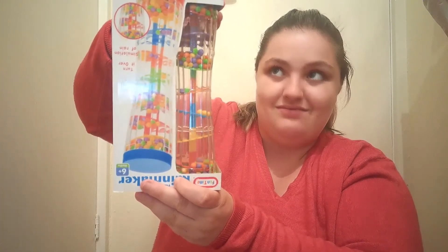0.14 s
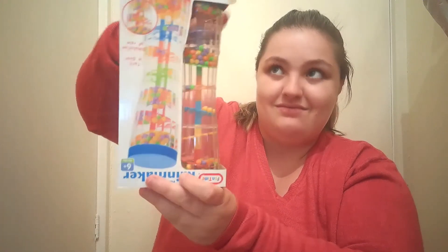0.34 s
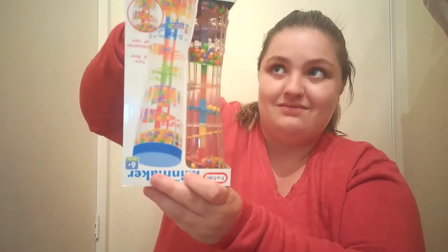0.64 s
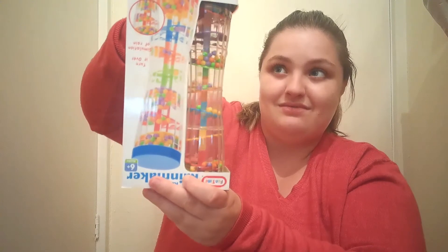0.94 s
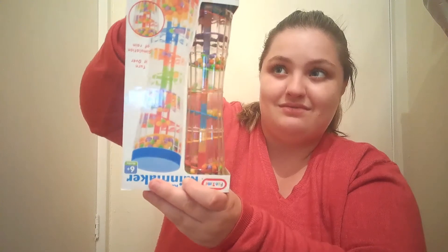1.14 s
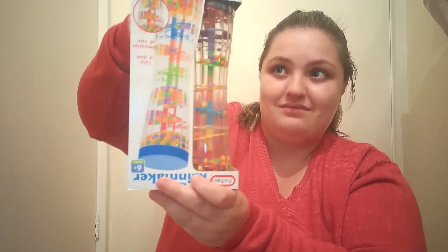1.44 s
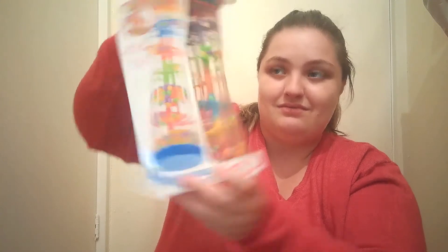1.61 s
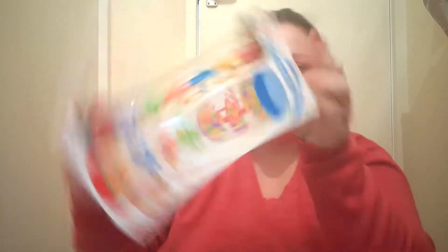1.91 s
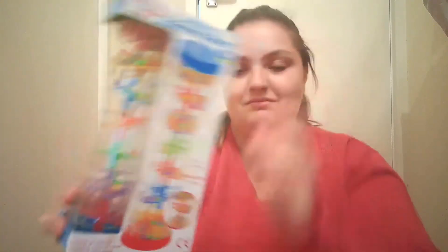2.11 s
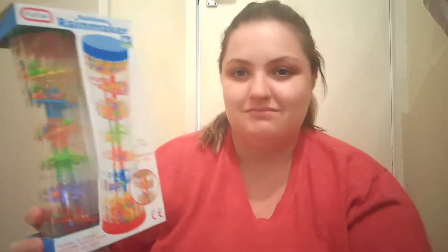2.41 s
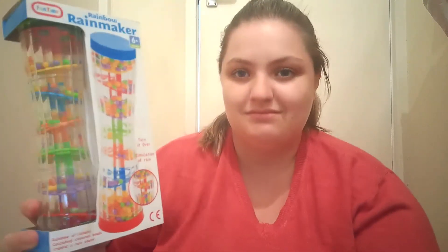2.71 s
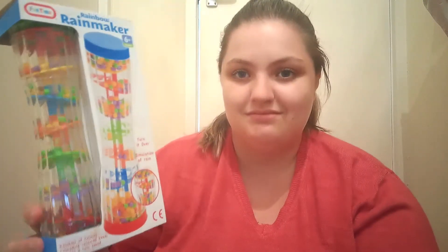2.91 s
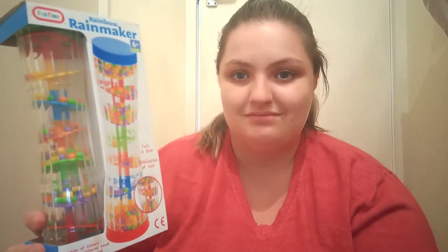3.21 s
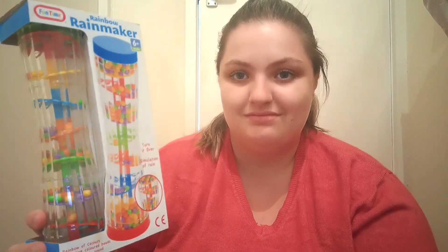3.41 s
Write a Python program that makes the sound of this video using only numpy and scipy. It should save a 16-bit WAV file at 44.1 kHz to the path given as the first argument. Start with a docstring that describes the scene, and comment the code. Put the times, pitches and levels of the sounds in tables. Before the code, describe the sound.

Small plastic beads trickling through a rainmaker toy, a rain-like rattle that grows louder

```python
"""A plastic rainmaker toy in a small, faintly humming room. It opens on a short shake, the packed beads
shimmering as they slam into the end cap. After a pause they trickle down through the baffles: every bead
ticks, the baffles ring near 5 kHz, and the tube's wall and air add hollow resonances. Just after two
seconds the toy is turned over and the beads pour again, harder. Along the way, hands bump the toy."""
import sys
import numpy as np
from scipy import signal
from scipy.fft import rfft, irfft
from scipy.io import wavfile
from scipy.ndimage import uniform_filter1d

SR = 44100
rng = np.random.default_rng(int(sys.argv[2]) if len(sys.argv) > 2 else 0)


def bounce(signal):
    """Save signal as a 16-bit WAV file at the path given by the first command-line argument."""
    frames = np.transpose(np.atleast_2d(signal))
    limited = np.clip(frames, -1, 1)
    pcm = np.round(limited * 32767).astype(np.int16)
    wavfile.write(sys.argv[1], SR, pcm)


N = 156555
T = np.arange(N) / SR


def from_db(db):
    """Decibels to gain."""
    return 10 ** (np.asarray(db) / 20)


def rms_one(x):
    """Scale to rms 1."""
    return x / np.sqrt(np.mean(x ** 2) + 1e-20)


def envelope(rows):
    """Straight ramps between rows of time in seconds and value."""
    return np.interp(T, *np.transpose(rows))


def equalise(x, curve):
    """Minimum-phase EQ of unit power, drawn through rows of frequency in Hz and level in dB."""
    size = 4096
    hz, db = np.transpose(curve)
    grid_hz = np.maximum(np.arange(size // 2 + 1) * SR / size, 1)
    gain = from_db(np.interp(np.log(grid_hz), np.log(hz), db))
    cepstrum = irfft(np.log(gain))
    cepstrum[1:size // 2] *= 2
    cepstrum[size // 2 + 1:] = 0
    response = irfft(np.exp(rfft(cepstrum)))
    return signal.fftconvolve(x, response / np.linalg.norm(response))[:N]


def resonate(x, hz, width_hz):
    """One resonance, gain 1 at its peak."""
    r = np.exp(-np.pi * width_hz / SR)
    feedback = [1, -2 * r * np.cos(2 * np.pi * hz / SR), r * r]
    return signal.lfilter(np.array([1, 0, -1]) * (1 - r * r) / 2, feedback, x + 1e-18)


def band(x, hz, width_hz):
    """A resonance applied twice: rounded onset, steep skirts."""
    return resonate(resonate(x, hz, width_hz), hz, width_hz)


def strikes(rows):
    """One click for each row of start in seconds and level in dB."""
    out = np.zeros(N)
    for start_s, db in rows:
        out[int(start_s * SR)] += from_db(db)
    return out


def bursts(clicks, decay_s):
    """Each click becomes a tiny burst of noise that starts at the click's height."""
    power = signal.lfilter([1], [1, -np.exp(-2 / (decay_s * SR))], clicks ** 2 + 1e-18)
    return np.sqrt(power) * rng.standard_normal(N)


def ring_modes(clicks, modes, blend, spread_db=1.5):
    """Clicks strike each mode unevenly; blend fades the modes from their first level to their second."""
    out, power = 0, 0
    for hz, width_hz, first_db, second_db in modes:
        gain = from_db(first_db + blend * (second_db - first_db))
        strength = rng.choice([-1, 1], N) * from_db(spread_db * rng.uniform(-1, 1, N))
        out = out + gain * band(clicks * strength, hz, width_hz)
        power = power + gain ** 2 * np.pi * width_hz / SR / 2
    return out / np.sqrt(power)


def turned(middle_s=2.25, length_s=0.097):
    """A ramp from 0 before the toy is turned over to 1 after."""
    return np.clip((T - middle_s) / length_s + .5, 0, 1)


def clumps(depth_db, per_s=28):
    """Beads pass the holes in clumps: a flutter in dB, a quarter as deep in the fuller second pour."""
    knots = rng.standard_normal(400)
    flutter = np.interp(T * per_s, np.arange(len(knots)), knots)
    return depth_db * flutter * (1 - 0.75 * turned())


def impacts(flow_db, base_per_s, spread_db=3.5, even_s=0.12):
    """Random bead hits of uneven size. A stronger flow brings more of them; power stays near 1."""
    per_s = base_per_s * from_db(.65 * np.maximum(flow_db + 20.5, -6))
    sizes = from_db(spread_db * np.minimum(rng.exponential(1, N), 2)) * rng.choice([-1, 1], N)
    clicks = sizes * (rng.random(N) < per_s / SR)
    span = int(even_s * SR)
    power = uniform_filter1d(uniform_filter1d(clicks ** 2, span), span)
    return clicks / np.sqrt(np.maximum(power, per_s / SR))


# The tone of the empty room. Each row: frequency in Hz, relative level in dB.
ROOM_TONE_EQ = [(20, -5), (42, 2.5), (60, -9.5), (120, -7.5), (250, -14.5), (600, -17), (2000, -31),
                (8000, -47), (15000, -47)]


def room_tone(rumble_db=-47.5, hum_db=-51.5):
    """A bed of rumble with a low, wavering hum."""
    hum = rms_one(resonate(rng.standard_normal(N), hz=43.2, width_hz=7))
    rumble = equalise(rng.standard_normal(N), ROOM_TONE_EQ)
    return from_db(rumble_db) * rumble + from_db(hum_db) * hum


def room_reverb(x, t60_s=0.21, wet_db=-2, predelay_s=0.0027, paths=3, changes_per_s=25):
    """A short, dense tail. Hits come from all along the tube, so their paths to the walls keep changing."""
    age = T[:SR // 2]
    tails = rng.standard_normal((paths, len(age))) * from_db(-60 * age / t60_s) * (age > predelay_s)
    knots = rng.standard_normal((paths, 400))
    sends = np.array([np.interp(T * changes_per_s, np.arange(len(row)), row) for row in knots])
    sends /= np.linalg.norm(sends, axis=0)
    wet = sum(signal.fftconvolve(x * send, tail / np.linalg.norm(tail))[:N]
              for send, tail in zip(sends, tails))
    return (x + from_db(wet_db) * wet) / np.sqrt(1 + from_db(wet_db) ** 2)


# Handling noise. Each row: start in seconds, level in dB, low and high edge in Hz, decay in seconds.
HAND_BUMPS = [(0.133, -35, 400, 1400, 0.0055), (0.329, -41, 600, 2800, 0.023),
              (0.429, -35.5, 350, 1400, 0.022), (0.694, -28.5, 330, 1400, 0.015),
              (1.604, -41.5, 333, 440, 0.053), (2.331, -32, 35, 110, 0.016), (2.895, -36, 28.2, 48, 0.13)]


def hands():
    """Hands scuff and bump the toy: dull knocks, rustles and low thumps."""
    out = 0
    for start_s, db, low_hz, high_hz, decay_s in HAND_BUMPS:
        age = np.maximum(T - start_s, 0) / decay_s
        bump_band = signal.butter(2, [low_hz, high_hz], "band", fs=SR, output="sos")
        scuff = rms_one(signal.sosfilt(bump_band, rng.standard_normal(N)))
        out = out + from_db(db) * scuff * np.minimum(age * 3, 1) * np.exp(-age)
    return out


def end_cap_slam(start_s=.088, level_db=-30, hz=11800, width_hz=600):
    """The packed beads hit the end cap at the peak of the shake: a brief, high shimmer."""
    contacts = bursts(strikes([(start_s, level_db)]), decay_s=0.023)
    return band(contacts, hz, width_hz) / np.sqrt(np.pi * width_hz / SR / 2)


# Bright accents from single beads. Each row: start in seconds, relative level in dB, pitch in Hz.
HARD_LANDINGS = [(0.377, -26, 4930), (0.4045, -17, 4900), (0.4788, -10, 4890), (0.4893, -16, 4930),
                 (0.5084, -21, 4890), (0.5402, -7, 4930), (0.5644, -20, 5100), (0.5734, -12.5, 4950),
                 (0.617, -22, 4980), (0.629, -10, 4730), (0.7274, -12.5, 4900), (0.7702, -7, 4730),
                 (0.7837, -8, 7140), (0.8101, -7, 6860), (0.9263, -9, 4800), (0.9414, -7, 4970),
                 (1.012, -4.5, 6900), (1.031, -4, 5250), (1.1167, -2, 4790), (1.1344, -14, 4780),
                 (1.3292, -7, 4750), (1.9729, -7, 4450), (2.046, -1.5, 5250)]


def baffle_pings(trim_db=-3, attack_s=.0007, decay_s=0.0043):
    """A bead that lands hard rings one baffle mode for a few milliseconds."""
    out, age = np.zeros(N), T[:SR // 10]
    shape = (1 - np.exp(-age / attack_s)) * np.exp(-age / decay_s)
    for start_s, db, hz in HARD_LANDINGS:
        start = int(start_s * SR)
        out[start:start + len(age)] += from_db(db + trim_db) * shape * np.sin(2 * np.pi * hz * age)
    return out


# The swell of the ringing baffles. Each row: time in seconds, relative level in dB.
BAFFLE_SWELL = [(0, -33), (.05, -41), (.09, -19.5), (.17, -49), (.37, -63), (.41, -30.5), (.56, -30),
                (.9, -27.5), (1.0, -28), (1.14, -22.5), (1.5, -19.5), (1.68, -23), (1.93, -22.5),
                (2.0, -21), (2.2, -22), (2.36, -15), (2.65, -18.5), (2.85, -15.5), (3.05, -16.5),
                (3.55, -17.5)]
# Their ring. Each row: pitch in Hz, width in Hz, relative level in dB before the turn and after it.
BAFFLE_RING = [(4190, 620, -15, -6), (4730, 275, -4, -1), (4930, 160, -7, -4), (5210, 350, -4.5, -0.5),
               (5470, 430, -9, -8), (6980, 550, -7, -22)]


def baffles(trim_db=-2.5):
    """Beads that drop from one level to the next keep the baffles ringing."""
    level_db = envelope(BAFFLE_SWELL)
    drops = impacts(level_db, base_per_s=350) * from_db(level_db + trim_db + clumps(depth_db=1.9))
    return ring_modes(drops, BAFFLE_RING, turned())


# The swell of the air in the tube. Each row: time in seconds, relative level in dB.
AIR_SWELL = [(0, -56), (.12, -51), (.28, -71), (.41, -62), (.5, -45), (.75, -39), (.92, -39), (1.02, -36),
             (1.2, -37), (1.42, -32.5), (1.74, -38), (1.92, -38.5), (2.04, -34), (2.3, -31.5), (2.8, -30),
             (3.55, -33.5)]
# Its hollow tone. Each row: pitch in Hz, width in Hz, relative level in dB with the top empty, then full.
AIR_RING = [(372.5, 93, -12.5, -13.5), (544, 300, -18, -15), (783, 186, 1.5, -2), (906, 230, -6, -7.5),
            (1056, 195, -12.5, 1), (1370, 370, -13, -10)]
# How full the top chamber is. Each row: time in seconds, share of the beads from 0 to 1.
TOP_FILL = [(0, 0.8), (.65, 0.9), (1.05, 0.52), (2.18, 0), (2.36, 0.94), (3.55, 0.7)]
# Single beads thudding on the end cap. Each row: start in seconds, relative level in dB.
CAP_THUDS = [(.81, -15), (.998, -15), (1.06, -16), (1.14, -14), (1.715, -8), (2.02, -6), (2.06, -18)]


def tube_air(clicks, trim_db=-2):
    """Patter and thuds sound the air inside; the beads left on top shift the balance of its modes."""
    patter = clicks * from_db(envelope(AIR_SWELL) + trim_db + clumps(depth_db=1.47))
    return ring_modes(patter + strikes(CAP_THUDS), AIR_RING, envelope(TOP_FILL))


# The swell of the tube wall. Each row: time in seconds, relative level in dB.
WALL_SWELL = [(0, -50), (.09, -42.5), (.26, -60), (.38, -62), (.45, -43), (.7, -37.5), (1.0, -35.5),
              (1.56, -33), (1.87, -29), (1.93, -36), (2.1, -30), (2.28, -25.5), (2.88, -25), (3.55, -27)]
# Its ring. Each row: pitch in Hz, width in Hz, relative level in dB before the turn and after it.
WALL_RING = [(1766, 240, -5, 0), (2000, 136, -8, 3), (2070, 360, -5, -8.5), (2390, 350, -4.5, -3.5),
             (2943, 560, -7, -5), (3254, 243, 1.5, 2)]


def tube_wall(clicks, trim_db=-1.5):
    """Bead hits ring the plastic wall, which gives the rattle its midrange body."""
    return ring_modes(clicks * from_db(envelope(WALL_SWELL) + trim_db), WALL_RING, turned())


def ticks(clicks, spots=18, width_hz=390, ring_gain=0.67, contact_s=0.00046):
    """Each hit dies fast as it spreads through the plastic; the spot it lands on adds its own short ring."""
    spot = rng.integers(0, spots, N)
    rings = sum(resonate(clicks * (spot == k), hz, width_hz)
                for k, hz in enumerate(np.geomspace(4000, 13000, spots)))
    ringing = ring_gain * rings / np.sqrt(np.pi * width_hz / SR)
    contact = bursts(clicks, contact_s) / np.sqrt(contact_s * SR / 2)
    return (contact + ringing) / np.sqrt(1 + 2 * ring_gain ** 2)


# The flow of beads in the shake, then in both pours. Each row: time in seconds, relative level in dB.
SHAKE_FLOW = [(0.0, -29), (0.058, -64), (0.062, -34), (0.09, -26.5), (0.138, -51), (0.16, -27),
              (0.198, -75), (0.29, -68)]
POUR_FLOW = [(0.36, -54.5), (0.44, -36), (0.56, -26.5), (0.65, -30), (0.66, -26.5), (0.74, -26.5),
             (0.77, -32), (0.79, -24.5), (1.26, -24), (1.28, -20.5), (1.3, -21.5), (1.43, -21), (1.46, -24),
             (1.64, -19.5), (1.67, -17), (1.75, -21.5), (1.87, -18.5), (1.93, -25), (2.15, -15),
             (2.48, -12.5), (2.54, -15.5), (2.85, -13), (2.86, -14.5), (3.54, -17.5), (3.55, -18)]
# Sharp clacks of beads on the wall. Each row: start in seconds, relative level in dB.
WALL_CLACKS = [(0.0634, -20), (0.0734, -20), (0.0817, -18), (0.0912, -9), (0.1476, -11), (0.1584, -23),
               (0.5074, -9), (0.6599, -5), (0.6754, -2), (0.8927, -1), (1.012, -7), (1.0539, -3),
               (1.8454, -22), (1.8764, -8), (2.3574, 10)]
# The bright colour of ticks and clacks. Each row: frequency in Hz, relative level in dB.
RATTLE_EQ = [(200, -32.5), (560, -27), (1400, -18.5), (2700, -14), (3600, -7.5), (4300, -4), (5900, -2),
             (7000, -1.5), (8500, -1.5), (10000, -5), (12100, -8), (13200, -15.5), (15400, -28)]


def beads(tick_trim_db=0.5, clack_trim_db=-15):
    """The stream of beads ticks and clacks on the plastic and drives the wall and the air of the tube."""
    flow_db = envelope(list(SHAKE_FLOW) + list(POUR_FLOW))
    clicks = impacts(flow_db, base_per_s=2100) * from_db(clumps(depth_db=0.93))
    clacks = from_db(clack_trim_db) * bursts(strikes(WALL_CLACKS), decay_s=.005)
    ticking = ticks(clicks * from_db(flow_db + tick_trim_db))
    return equalise(ticking + clacks, RATTLE_EQ) + tube_wall(clicks) + tube_air(clicks)


def scene():
    """The toy and the hands in the small room, over its room tone, in mono."""
    sources = beads() + baffles() + baffle_pings() + end_cap_slam() + hands()
    return (room_reverb(sources) + room_tone())[None]


def record(dry, ceiling=.85, cutoff_hz=15500):
    """A soft clip rounds the peaks, then a steep low-pass takes off the very top."""
    rounded = ceiling * dry / (ceiling ** 4 + dry ** 4) ** .25
    return signal.sosfilt(signal.ellip(10, .2, 90, cutoff_hz, fs=SR, output="sos"), rounded)


dry = scene()
out = record(dry)
bounce(out)
```